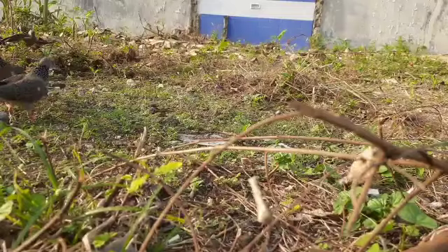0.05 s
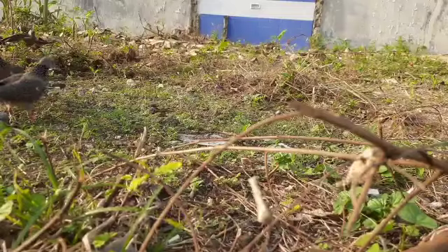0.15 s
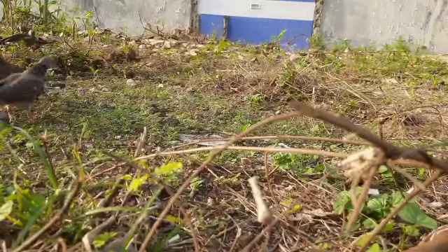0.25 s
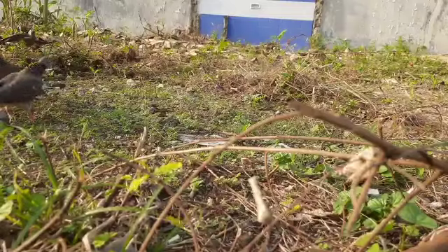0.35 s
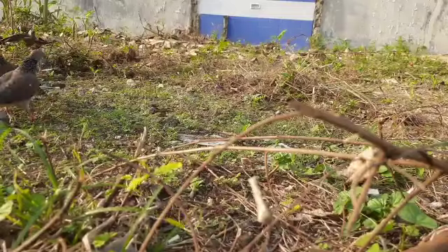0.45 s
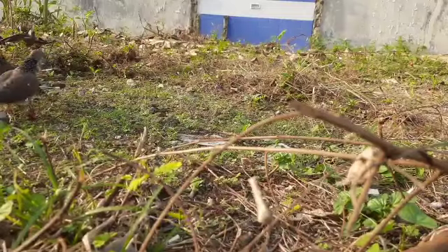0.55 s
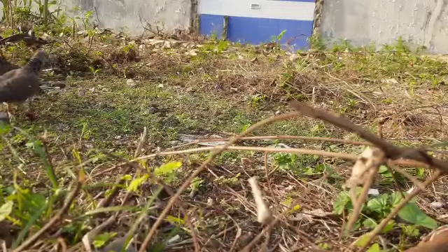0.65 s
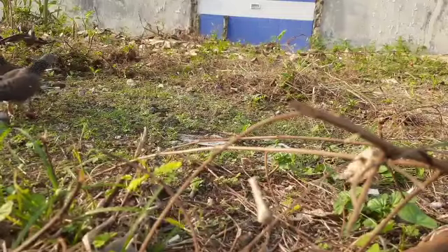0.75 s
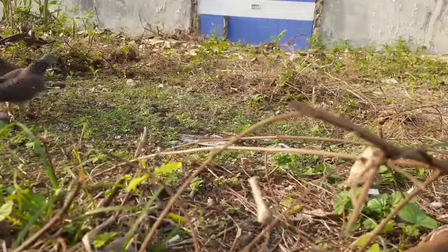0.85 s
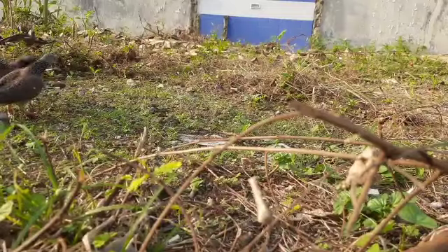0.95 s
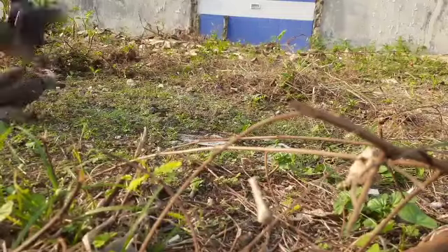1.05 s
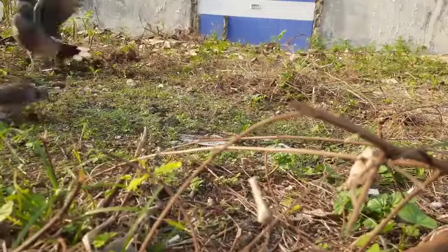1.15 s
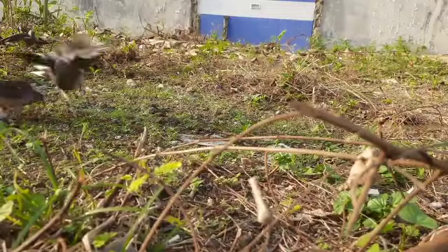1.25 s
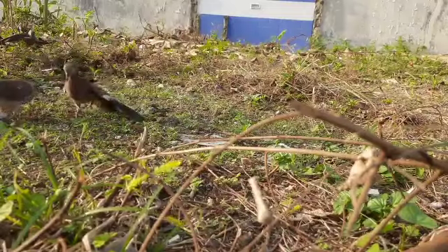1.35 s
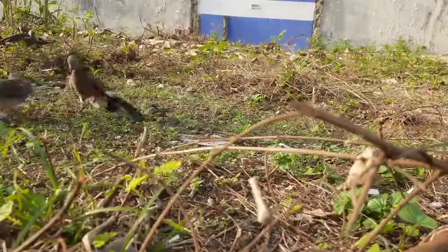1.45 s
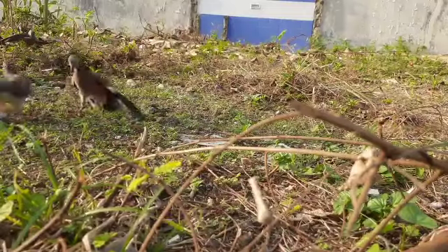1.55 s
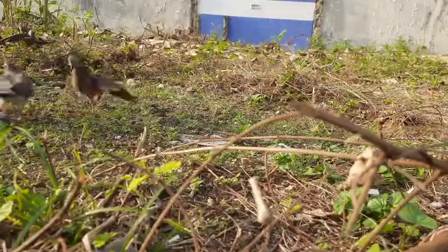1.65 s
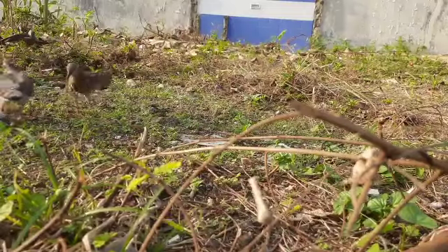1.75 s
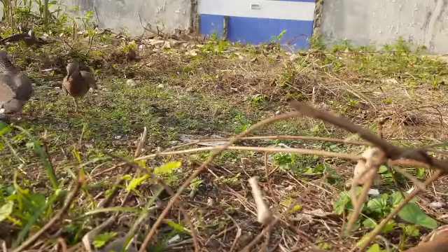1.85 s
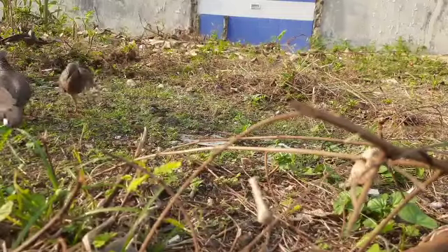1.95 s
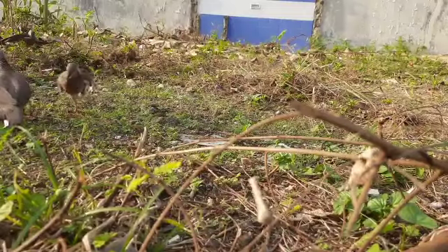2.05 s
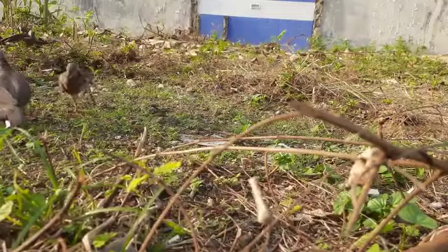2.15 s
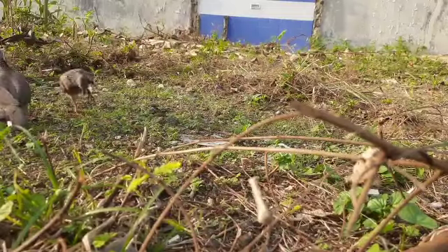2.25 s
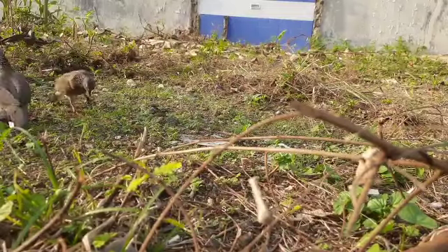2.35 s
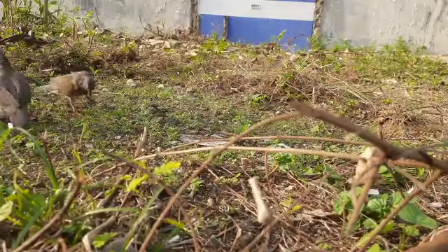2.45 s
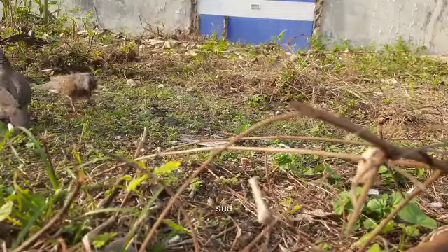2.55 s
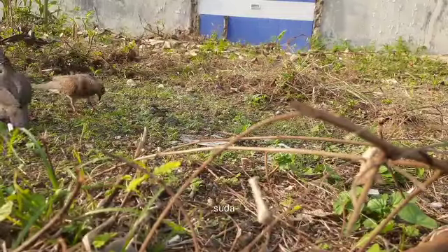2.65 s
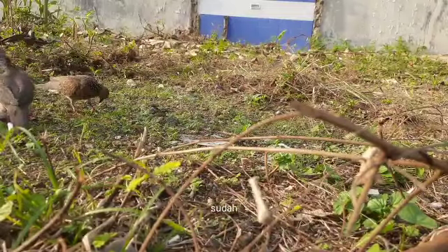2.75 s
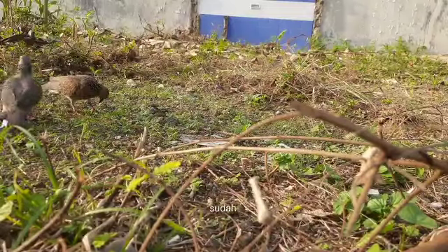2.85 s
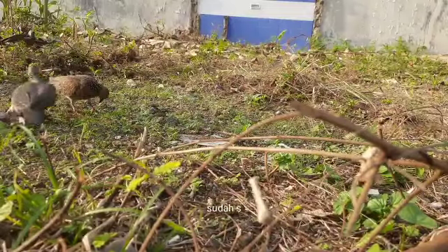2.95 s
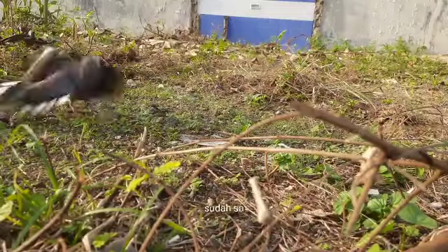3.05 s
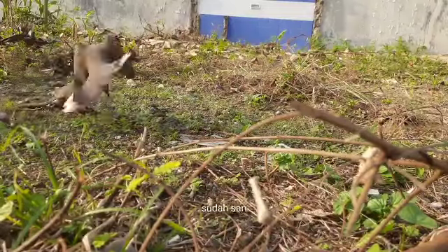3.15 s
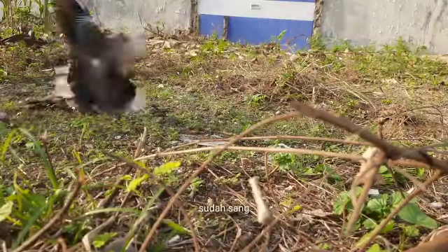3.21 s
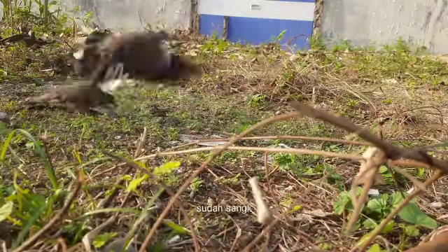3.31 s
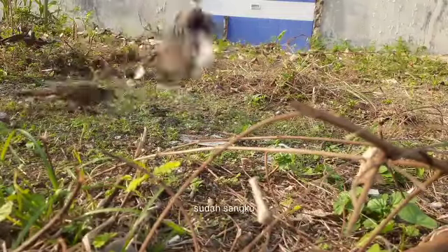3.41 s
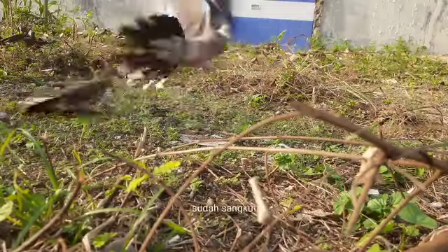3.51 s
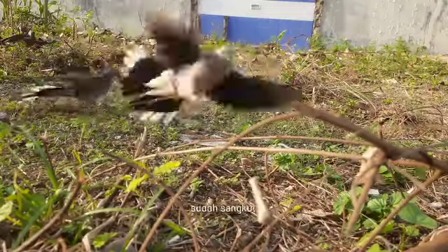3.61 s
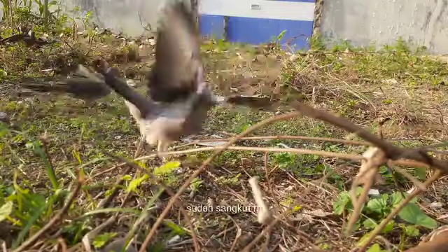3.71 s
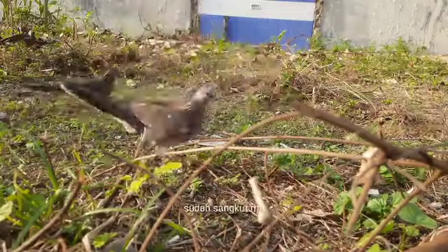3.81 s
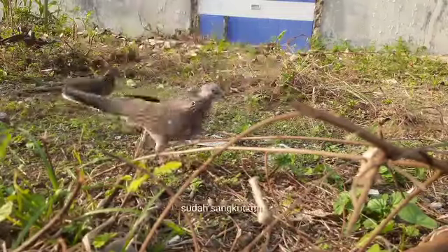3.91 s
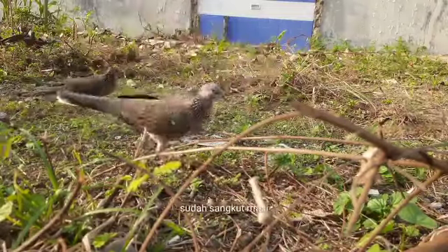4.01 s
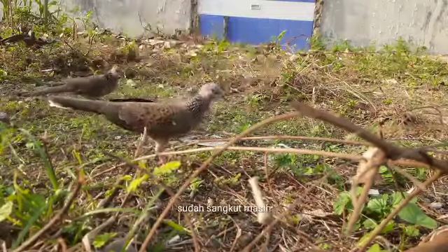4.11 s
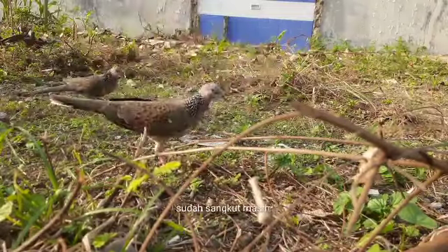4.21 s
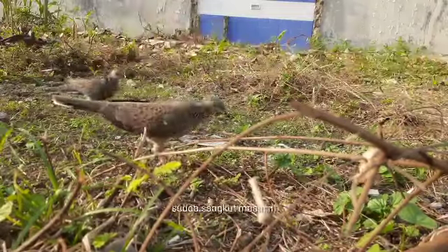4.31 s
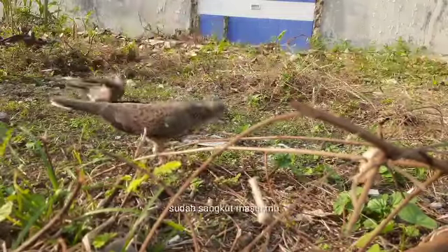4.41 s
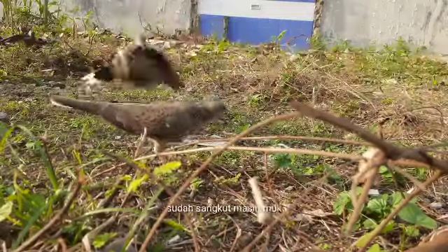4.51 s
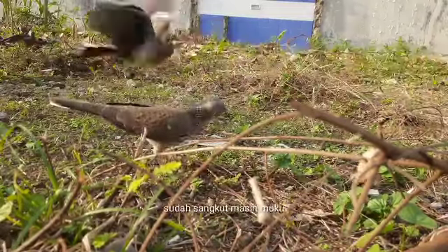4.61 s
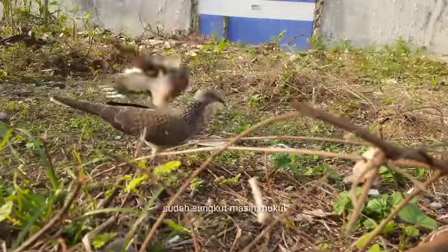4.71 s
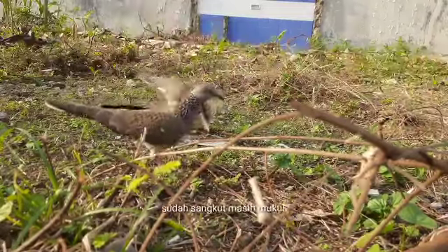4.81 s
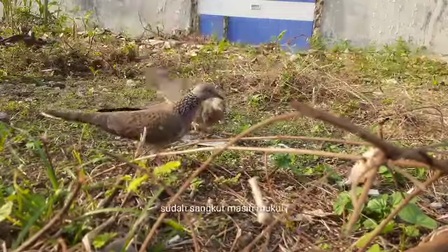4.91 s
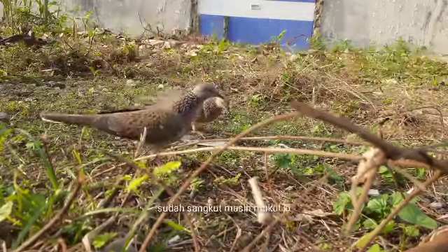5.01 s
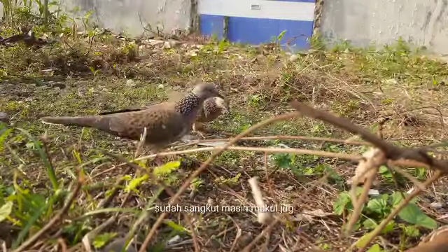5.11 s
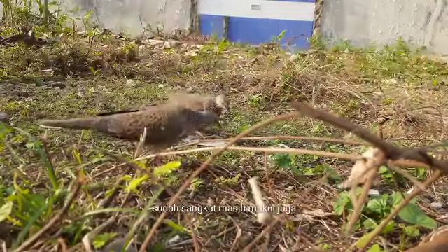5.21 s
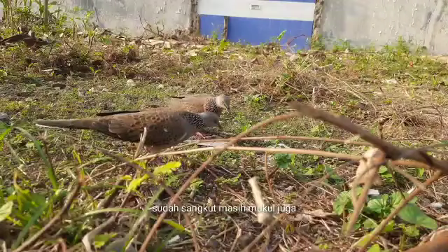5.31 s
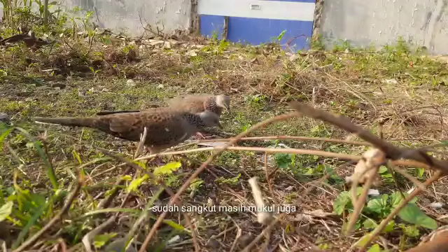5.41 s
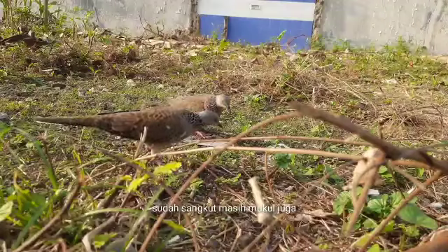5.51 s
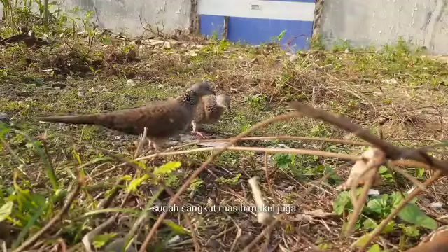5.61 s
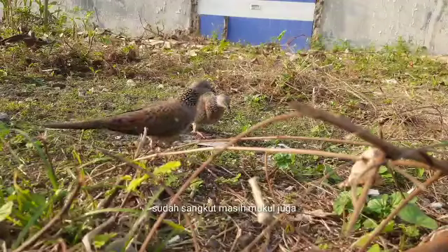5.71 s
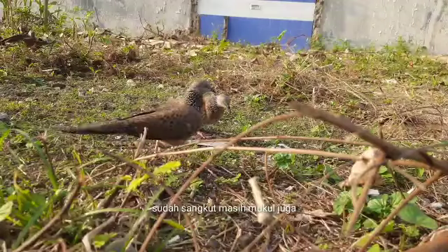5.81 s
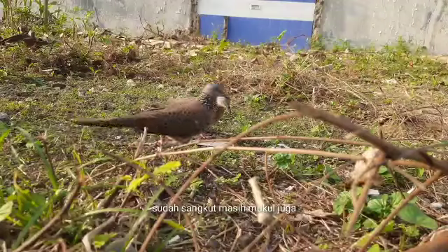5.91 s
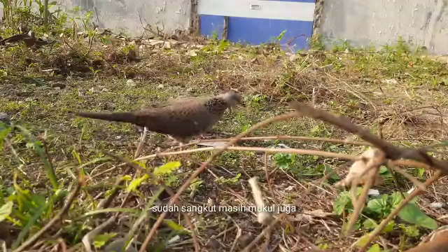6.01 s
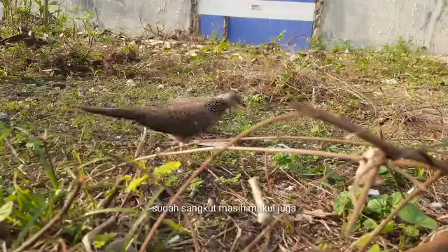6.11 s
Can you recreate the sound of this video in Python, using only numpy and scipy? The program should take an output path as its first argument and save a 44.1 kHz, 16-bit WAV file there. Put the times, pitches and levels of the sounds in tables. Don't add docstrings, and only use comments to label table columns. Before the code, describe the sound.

A quiet outdoor yard opens with soft far-road rumble, slight hiss, faint grass rustle and small distant sparrow chirps at 0.6 and 0.8 seconds. At about 1.05 a dove close on the left bursts into a flurry: dry feather slaps, low puffs and short airy whistles, strongest near 1.15, gone by 1.3. Sparse stalk ticks and soft brushes follow, with chirps and a low, level bird call around 1.8 to 2.2 and another chirp at 2.6. A quick sharp hop hits at 3.09, then from 3.3 to 3.65 a longer flight gives several heavy, thumping, crackling beats, nearly overloading, moving from left to centre. Rustles settle as a faint engine note passes around 4. A light flutter stirs at 4.5, a small flap at 4.96, then only traffic, faint ticks and far chirps until about 6.1.

```python
import sys
import numpy as np
from scipy import signal
from scipy.fft import rfft, irfft, next_fast_len
from scipy.io import wavfile
from scipy.ndimage import uniform_filter1d, map_coordinates

SR = 44100
rng = np.random.default_rng(int(sys.argv[2]) if len(sys.argv) > 2 else 0)


def convert_level_to_amplitude(level_db):
    exponent = np.asarray(level_db, float) / 20
    return 10 ** exponent


def master_out(mix):
    frames = np.transpose(np.atleast_2d(mix))
    ceiling = np.clip(frames, -1, 1)
    pcm = np.round(ceiling * 32767).astype(np.int16)
    wavfile.write(sys.argv[1], SR, pcm)


N = 271773


def unit(x):
    return x / np.sqrt(np.mean(x ** 2) + 1e-20)


def along(points, hz):
    f, value = np.transpose(points)
    return np.interp(np.log(hz + 1), np.log(f + 1), value)


def curves(rows, outside=None):
    s, *columns = np.transpose(rows)
    return [np.interp(np.arange(N) / SR, s, column, outside, outside) for column in columns]


def wobble(rate):
    knots = rng.standard_normal(int(N * rate / SR) + 4)
    return map_coordinates(knots, [np.arange(N) * rate / SR])


def filtered(x, response):
    m = next_fast_len(x.shape[-1] + 1024)
    return irfft(rfft(x, m) * response(np.fft.rfftfreq(m, 1 / SR)), m)[..., :x.shape[-1]]


def colour(spectrum):
    return lambda hz: convert_level_to_amplitude(along(spectrum, hz)) * (hz > spectrum[0][0]) * (hz < spectrum[-1][0])


def rush(spectrum, alike, patchy_db, grit=0):
    grains = rng.standard_normal((2, N)) * convert_level_to_amplitude(grit * rng.exponential(size=N))
    z = signal.stft(grains, nperseg=512)[2]
    field = uniform_filter1d(rng.standard_normal(z.shape[1:]), size=6, axis=0)
    field = uniform_filter1d(field, size=10, axis=1)
    pair = signal.istft(z * convert_level_to_amplitude(patchy_db * unit(field)), nperseg=512)[1][:, :N]

    def mid_and_side(hz):
        turn = np.arccos(np.clip(along(alike, hz), -1, 1)) / 2
        return colour(spectrum)(hz) * [np.cos(turn), np.sin(turn)]

    mid, side = filtered(pair, mid_and_side)
    return unit(np.array([mid + side, mid - side]))


def add(track, s, sound):
    spot = track[round(s * SR):][:len(sound)]
    spot += sound[:len(spot)]


# frequency in Hz, density in dB per Hz.
HISS = [(1760, -28.5), (3000, -5), (3660, -15), (4400, -14.5), (8000, -10), (11100, -13.5), (13500, -26.5),
        (16000, -26.5)]


def hiss():
    return convert_level_to_amplitude(-65) * rush(HISS, [(3000, 0)], patchy_db=3.1)


# time in seconds, weight in dB.
LORRIES = [
    [(0.0, -35), (0.46, -39.5), (0.61, -36), (0.88, -39), (1.26, -32.5), (1.53, -35), (1.88, -37.5),
     (3.07, -36.5), (3.28, -34)],
    [(3.72, -33), (4.3, -36), (4.85, -37.5), (5.08, -33.5), (5.8, -34.5), (6.06, -37.5), (6.16, -40)],
]
# time in seconds, nearness of the cars in dB.
CARS = [
    [(0.0, -44), (0.91, -44), (1.24, -42.5), (2.24, -41.5), (2.39, -43.5), (2.61, -40), (3.09, -39.5),
     (3.28, -40)],
    [(3.76, -39.5), (3.85, -39.5), (4.19, -42.5), (4.58, -41.5), (5.5, -43), (5.66, -36.5), (6.16, -39)],
]
# time in seconds, level in dB, pitch in Hz.
WHINE = [
    (3.8, -72, 640),
    (3.95, -57, 660),
    (4.15, -56, 660),
    (4.35, -70, 640),
]
# frequency in Hz, density in dB per Hz.
RUMBLE = [(12, -55), (20, -35.5), (27, -18), (52, -4), (108, 4), (163, -4.5), (234, -10), (300, -14),
          (390, -28), (660, -120)]
DRONE = [(110, -45.5), (180, -1.5), (237, 1.5), (270, -4.5), (383, -5), (900, -34.5), (1170, -70.5),
         (1980, -120)]
TYRES = [(350, -26.5), (600, -5.5), (658, -7.5), (741, -9), (922, -11.5), (2020, -8), (2930, -12),
         (3640, -19), (4500, -20), (5850, -32.5), (9900, -120)]
# frequency in Hz, left-right likeness from -1 to 1.
FAR_ALIKE = [(60, 0.812), (130, 0.958), (290, 0.859), (640, 0.234), (1400, -0.152), (3100, -0.12)]


def traffic():
    (rumble_db,), (drone_db,) = curves(np.vstack(LORRIES)), curves(np.vstack(CARS))
    swell = wobble(14)
    rumble = convert_level_to_amplitude(rumble_db + 2.0 + 1.907 * swell) * rush(RUMBLE, FAR_ALIKE, patchy_db=0.7538)
    drone = convert_level_to_amplitude(drone_db + 1.79 * swell) * rush(DRONE, FAR_ALIKE, patchy_db=-1.0)
    note_db, note_hz = curves(WHINE, -120)
    note = convert_level_to_amplitude(note_db) * wobble(150) * np.sin(2 * np.pi * np.cumsum(note_hz) / SR)
    tyre_db = -55 + 0.06 * (drone_db - drone_db.mean())
    return rumble + drone + note + convert_level_to_amplitude(tyre_db) * rush(TYRES, FAR_ALIKE, patchy_db=1.85)


# frequency in Hz, time to fade by 60 dB in seconds.
YARD = [(200, 0.025), (2000, 0.1475), (12000, 0.12)]


def yard(x):
    hz, t, z = signal.stft(rng.standard_normal((2, SR // 4)), SR, nperseg=128)
    fade = convert_level_to_amplitude(-60 * t / along(YARD, hz)[:, None])
    tail = signal.istft(z * fade, SR, nperseg=128)[1]
    late = np.pad(x, (60, 0))[None]
    return signal.fftconvolve(late, tail / np.linalg.norm(tail[0]), axes=1)[:, :N]


# start in seconds, level in dB, start pitch in Hz, end pitch in Hz, length in seconds.
CHIRPS = [
    (0.606, -59.5, 5210, 3905, 0.077),
    (0.806, -61.5, 5400, 4740, 0.028),
    (1.838, -60, 5200, 4390, 0.056),
    (2.58, -62.5, 5300, 3880, 0.078),
    (4.26, -63, 5100, 3900, 0.04),
    (5.795, -65, 5200, 4310, 0.054),
    (6.058, -66, 5240, 4300, 0.0396),
    (1.805, -59, 2350, 2351, 0.13),
    (1.893, -61, 2350, 2320, 0.09),
    (2.03, -64, 2360, 2346, 0.18),
]


def sparrows():
    out = np.zeros(N)
    for s, db, start_hz, end_hz, length in CHIRPS:
        u = np.linspace(0, 1, int(length * SR))
        pitch = end_hz + (start_hz - end_hz) * (1 - u) ** 1.2
        voice = np.sin(2 * np.pi * np.cumsum(pitch) / SR)
        add(out, s, convert_level_to_amplitude(db + 3) * np.sin(np.pi * u ** .6) * voice)
    out = out * (.6 + .8 * wobble(1100))
    return .4 * out + .9 * yard(out)


# peak time in seconds, peak level in dB, time to fade by 10 dB in seconds.
GRASS = [(0.0, -59.5, 0.23), (0.661, -65, 0.19), (1.0, -67.5, 0.75), (1.065, -45.5, 0.1049),
         (1.125, -49.5, 0.1782), (1.16, -54.5, 0.2929), (1.414, -58.5, 0.16), (1.514, -65.5, 0.19),
         (1.649, -63.5, 0.22), (1.736, -61, 0.08), (1.888, -66.5, 0.27), (2.242, -59, 0.09),
         (2.55, -65.5, 0.6), (2.744, -62, -0.03), (2.9, -69.5, 2), (3.088, -38, 0), (3.195, -49.5, 0.0769),
         (3.35, -49, 0.2548), (3.47, -44.5, 0.038), (3.52, -44, 0.0239), (3.63, -47, 0.15), (3.8, -55, 0.1),
         (3.97, -57.5, -0.05), (4.126, -63, -0.39), (4.51, -54.5, 0.05), (4.6, -57, 0.16),
         (4.7, -61.5, 0.12), (4.966, -47, -0.0046), (5.822, -60, 0.04)]
# peak time in seconds, peak level in dB, time to fade by 10 dB in seconds.
DOWN = [
    (1.3, -75, 0.6),
    (1.45, -69, 0.09),
    (1.7, -66.5, 0.3),
    (3.05, -58.5, 0.29),
    (3.75, -58.5, 0.29),
    (4.58, -63.5, 0.5361),
    (4.68, -52.5, 0.09),
    (4.82, -56, 0.02),
]
# frequency in Hz, density in dB per Hz.
STALKS = [(1760, -14.5), (3000, -6.5), (5400, -8), (8000, -8), (11900, -6.5), (16000, -11)]
FLUFF = [(6000, -19.5), (9500, -7), (12000, 2), (16000, -4.5)]


def grass(rustles, spectrum, flicker_db):
    t = np.arange(N) / SR
    power = convert_level_to_amplitude(-75) ** 2
    for s, db, fade in rustles:
        away = np.maximum(t - s, (s - t) / 0.349) / abs(fade)
        power = power + convert_level_to_amplitude(db - 10 * away ** 1.425) ** 2
    grains = rush(spectrum, [(3000, 0.11), (9000, 0)], patchy_db=1.5, grit=0.965)
    return convert_level_to_amplitude(3.0) * np.sqrt(power) * unit(convert_level_to_amplitude(flicker_db * wobble(70)) * grains)


# time in seconds, effort in dB.
CHURN = [
    [(1.04, -51), (1.056, -33.5), (1.066, -16), (1.13, -46), (1.15, -21.5), (1.207, -44.5), (1.3, -43)],
    [(3.041, -49), (3.061, -39.5), (3.088, -11.5), (3.108, -31.5), (3.143, -38), (3.3, -43.5)],
    [(3.31, -34.5), (3.385, -25.5), (3.41, -21.5), (3.515, -19.5), (3.549, -12), (3.589, -26.5),
     (3.632, -19.5), (3.669, -32.5), (3.849, -54)],
    [(4.502, -74.5), (4.532, -41), (4.627, -58.5), (4.649, -57.5)],
]
# frequency in Hz, density in dB per Hz.
EDDY = [(40, -9.5), (80, 1), (200, -7), (420, -4), (700, -11.5), (1200, -23.5)]
VANE = [(500, -6), (900, -1.5), (1800, -3.5), (3000, -8.5), (5000, -18), (12000, -18), (17000, -39.5)]
# frequency in Hz, left-right likeness from -1 to 1.
NEAR_ALIKE = [(60, 0.984), (640, 0.944), (1400, 0.624), (3100, 0.62), (6800, 0), (15000, 0)]


def churn():
    efforts = [curves(flight, -200)[0] for flight in CHURN]
    flight_swish_db = [-34, -38, -31.5, -33]
    eddy = sum(convert_level_to_amplitude(effort) for effort in efforts)
    swish = sum(convert_level_to_amplitude(db + 0.863 * (effort + 21.0)) for db, effort in zip(flight_swish_db, efforts))
    lumps_db = 1.5 * wobble(80)
    low = unit(convert_level_to_amplitude(lumps_db) * rush(EDDY, NEAR_ALIKE, patchy_db=2.5))
    vanes = rush(VANE, NEAR_ALIKE, patchy_db=-6.0, grit=1.0)
    high = unit(convert_level_to_amplitude(lumps_db + 0.95 * wobble(140)) * vanes)
    return eddy * convert_level_to_amplitude(-3.5) * low + swish * convert_level_to_amplitude(-2.0) * high


# start in seconds, peak level in dB, pitch in Hz.
CUPS = [(1.0581, -15.5, 168.5), (1.072, -21.5, 306), (3.547, -21, 69.5), (3.42, -20, 75),
        (3.632, -18.5, 198), (3.0937, -22.5, 201), (1.0678, -10, 293), (1.083, -15.5, 254.5),
        (1.146, -7.5, 171), (1.183, -17.5, 121), (3.402, -25.5, 110), (3.077, -28, 520),
        (3.086, -26.5, 120), (3.473, -9, 120), (3.316, -17, 150), (3.357, -16, 117.5), (3.3929, -7, 132),
        (3.3935, -12.5, 496.4), (3.410, -25.5, 450), (3.481, -11.5, 409), (3.539, -6.5, 104.6),
        (3.5404, -7.5, 348), (3.553, -4.5, 158), (3.5774, -13.5, 246), (3.6028, -11, 484),
        (3.6152, -6.5, 122.5), (3.6174, -20.5, 398), (3.63, -19, 258), (4.520, -38, 500),
        (4.963, -30.5, 381)]
# start in seconds, peak level in dB, pitch in Hz, length in cycles.
WHISTLES_AND_POPS = [(1.058, -15, 964, 7.6), (1.060, -17.5, 1740, 9.5), (1.104, -24.5, 712, 10.1),
                     (1.121, -21.5, 587, 2.67), (1.1424, -14.5, 690, 1.93), (1.1448, -2.5, 765.6, 3.02),
                     (1.146, -11.5, 1747, 7.6), (1.181, -31, 703, 5), (1.22, -30, 840, 2.83), (1.395, -38.5, 1160, 4.36),
                     (1.920, -42, 1010, 3.55), (2.300, -48, 1180, 8.7), (3.086, -21, 1050, 2.26),
                     (3.0838, -14, 394, 1.6), (3.089, -10.5, 325, 1.95), (3.0895, -20, 1910, 1.98),
                     (3.1238, -25, 422, 3.2), (1.113, -20, 263, 4.2), (1.17, -18.5, 587, 1.01),
                     (3.4656, -10, 216.4, 1.18), (3.6215, -20, 890, 1.52), (3.356, -24, 1992, 10.5),
                     (3.532, -22, 1131, 16.5), (3.554, -13.5, 1712, 4.47), (4.961, -38.5, 2060, 7.3)]


def puffs():
    out = np.zeros(N)
    cups = [(s, db, hz, 1.343 * (hz / 150) ** 0.721) for s, db, hz in CUPS]
    for s, db, hz, cycles in WHISTLES_AND_POPS + cups:
        cycles = max(cycles, .8)
        turns = np.arange(int(cycles * SR / hz)) * hz / SR
        swell = np.sin(np.pi * (turns / cycles) ** 0.496)
        add(out, s, -convert_level_to_amplitude(db) * np.sin(2 * np.pi * turns) * swell)
    return filtered(out, lambda hz: 1 / (1 + (30 / (hz + 1)) ** 4))


# peak time in seconds, level in dB, soft-vane level in dB, dullness in dB per octave,
# length in ms.
BLOWS = [(1.0613, -16, 0.5, -5.5, 2.8), (1.0687, -24, 3.5, 3.5, 4.9), (1.084, -25.5, 1.5, 12, 1.77),
         (1.1092, -31.5, 6, 3, 2.52), (1.146, -7, -1, 2, 1.88), (1.149, -21, -8.5, -5, 3.2),
         (1.24, -32.5, -3.5, 2, 2.39), (3.0836, -21.5, 0, -8.5, 1.55), (3.0848, -29, 5.5, 9.5, 4.43),
         (3.0909, -27.5, 13, 11.5, 1.71), (3.1994, -36, 0.5, -5.5, 3.83), (3.3175, -26, -12, 1.5, 1.013),
         (3.3937, -9, -8, 0.5, 1.233), (3.4661, -11, -4, -2.5, 1.647), (3.4703, -32.5, 4.5, 10.5, 5.12),
         (3.4879, -27.5, -6, 9, 2.74), (3.541, -25.5, 5.5, 9, 3.8), (3.546, -28, 0.5, -2.5, 6.2),
         (3.5553, -23.5, -4, 11, 4.36), (3.576, -12.5, -9.5, -2, 0.83), (3.603, -41, 20.5, 2.5, 5.55),
         (3.6199, -33, 12, -15, 5.2), (3.6227, -24.5, 5.5, 2, 0.995), (4.9607, -39.5, -3, -1.5, 4.7)]
# peak time in seconds, level in dB, length in ms.
BRUSHES = [(1.1718, -37.5, 1.71), (1.221, -48.5, 7), (3.6424, -45.5, 1.5), (3.591, -44, 6),
           (4.95, -57.5, 3.08), (3.44, -43, 5.2), (1.3264, -52, 7.3), (1.634, -54, 4.5), (1.7955, -54, 1.6),
           (2.3233, -56.5, 5.5), (2.7246, -51.5, 1.5), (3.325, -37.5, 1.21), (3.3526, -40, 2.2),
           (3.3572, -35, 4.02), (3.3973, -37.5, 3.66), (3.413, -41.5, 1.7), (3.477, -30, 2),
           (3.5225, -54.5, 5), (3.5776, -28.5, 4.8), (3.606, -46, 5.8), (3.6304, -40, 3.4),
           (3.658, -37, 2.23), (3.6907, -44.5, 3.27), (3.748, -43.5, 3.65), (4.9728, -51, 5.5),
           (4.792, -55.5, 2), (3.508, -39, 1.7), (3.425, -44, 1.5), (3.431, -42, 2), (3.564, -37, 3)]
# peak time in seconds, level in dB, length in ms.
TICKS = [(0.1164, -47, 0.73), (1.0455, -46.5, 2.3), (1.393, -44.5, 10.2), (1.413, -52, 2.7),
         (1.5924, -84.5, 3), (1.7234, -66.5, 1.8), (1.8706, -46, 5.26), (2.077, -49.5, 1.78),
         (2.2174, -47, 1.6), (2.5054, -50, 1.4), (2.5514, -52, 1.4), (2.569, -49.5, 1.2),
         (3.0305, -46.5, 1.28), (3.045, -45.5, 4.64), (3.066, -38.5, 13.7), (3.105, -34, 14),
         (3.286, -42.5, 2.54), (3.3119, -45, 1.3), (3.4529, -28.5, 1.19), (3.7616, -44, 6.1),
         (3.926, -53, 1.63), (3.9561, -41, 2.1), (3.9997, -42.5, 2.5), (4.0591, -44.5, 1.8),
         (4.1134, -51, 5.1), (4.2556, -52.5, 1.1), (4.485, -53, 1.44), (4.5218, -39.5, 3.9),
         (4.5522, -46.5, 4), (4.62, -47, 2.48), (4.8253, -51, 1.4), (4.856, -49, 2), (4.885, -54, 1.46),
         (5.016, -51.5, 2.2), (5.358, -50, 1.82)]


def contacts():
    brushes = [(s, db, 5.5, -5, ms) for s, db, ms in BRUSHES]
    ticks = [(s, db, -9, -8, ms) for s, db, ms in TICKS]
    return sorted(BLOWS + brushes + ticks)


# frequency in Hz, density in dB per Hz.
QUILL = [(1470, -17.5), (2500, -4), (3970, -4), (5070, -7), (7440, -10), (10300, -9), (13500, -16.5),
         (15100, -18), (16300, -26)]


def slaps():
    out, t = np.zeros((N, 2)), np.arange(SR // 28) / SR
    hits = contacts()
    chance = rng.standard_normal((len(hits), 5, len(t)))

    def apart(hz):
        return np.arctan((hz / 8500) ** 3)

    def fade(rise):
        return t / rise * np.exp(1 - t / rise)

    for (s, db, vane_db, dull_db, ms), (crackle, flap, grit, *own) in zip(hits, chance):
        rise = 0.41 * max(ms, .4) / 1000
        crackle = crackle + 8 * (np.arange(len(t)) == round(rise * SR))

        def tint(hz):
            return colour(QUILL)(hz) * convert_level_to_amplitude(-np.clip(dull_db, -9, 9) * np.log2(hz / 7000 + 0.13))

        shared = filtered(crackle, lambda hz: tint(hz) * np.cos(apart(hz)))
        separate = filtered(np.array(own), lambda hz: tint(hz) * np.sin(apart(hz)))
        spray = unit((shared + separate) * convert_level_to_amplitude(3.56 * grit))
        quill = spray * (fade(rise) + 0.057 * fade(5 * rise))
        vane = convert_level_to_amplitude(vane_db) * unit(filtered(flap, colour(VANE))) * fade(1.09 * rise)
        add(out, s - rise, convert_level_to_amplitude(db - 1.5) * (quill + vane).T)
    return out.T


# time in seconds, lead of the left port in ms.
BEARING = [
    (0, 0.1933),
    (3.36, 0.1492),
    (3.40, 0.00069),
    (3.7, 0.0275),
    (4.5, 0.137),
    (4.95, 0.0367),
]


def placed(pair):
    lead_ms = curves(BEARING)[0]
    here, way = np.arange(N), np.array([[1], [-1]])
    treble = filtered(pair, lambda hz: 1 / (1 + (11000 / (hz + 1)) ** 4))
    shaded = pair + treble * (convert_level_to_amplitude(way * (2.5 + 8.7 * lead_ms)) - 1)
    return np.array([map_coordinates(v, [here + w * lead_ms * SR / 2000]) for v, w in zip(shaded, way)])


def scene():
    wings = slaps() + puffs()
    near = placed(wings) + convert_level_to_amplitude(-18.5) * yard(wings[0]) + churn()
    rustle = grass(GRASS, STALKS, 1.8) + grass(DOWN, FLUFF, 1.2)
    return near + rustle + traffic() + sparrows() + hiss()


def low_pass(x):
    return signal.sosfilt(signal.butter(12, 16470, fs=SR, output="sos"), x)


# frequency in Hz, gain in
# dB.
TONE = [(12, -21.5), (32, 0.5), (1000, 1), (15450, 1), (15620, -30), (16400, -34.5)]


def record(dry):
    hot = filtered(dry, lambda hz: convert_level_to_amplitude(along(TONE, hz))) * convert_level_to_amplitude([[.4], [-.4]])
    mix = hot / (1 + np.abs(hot) ** 8) ** (1 / 8)
    return low_pass(mix)


dry = scene()
out = record(dry)
master_out(out)
```